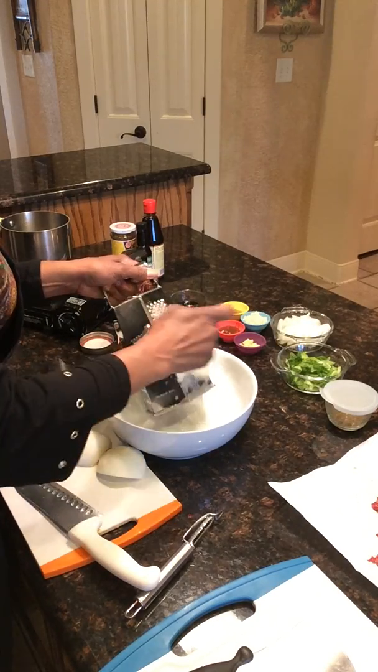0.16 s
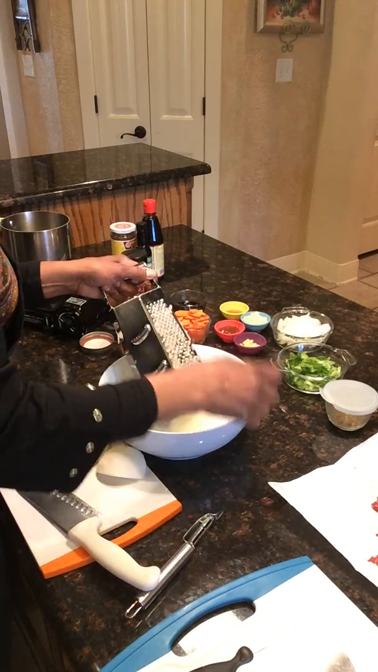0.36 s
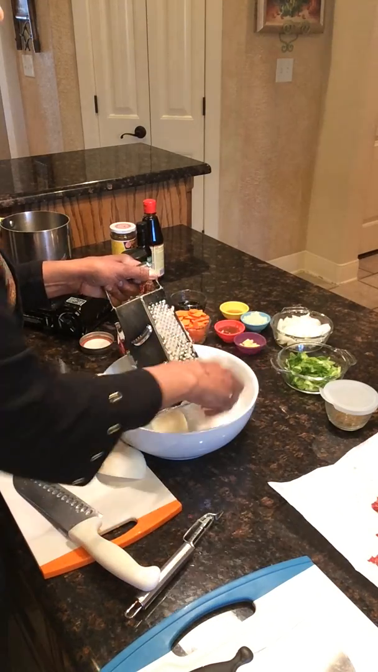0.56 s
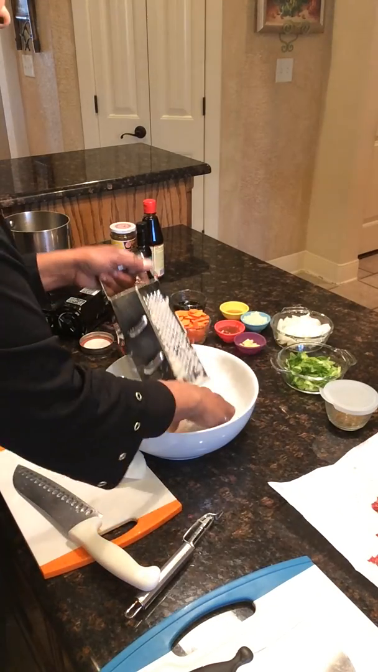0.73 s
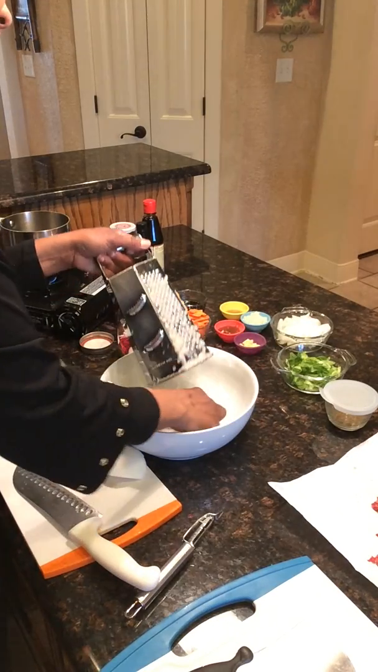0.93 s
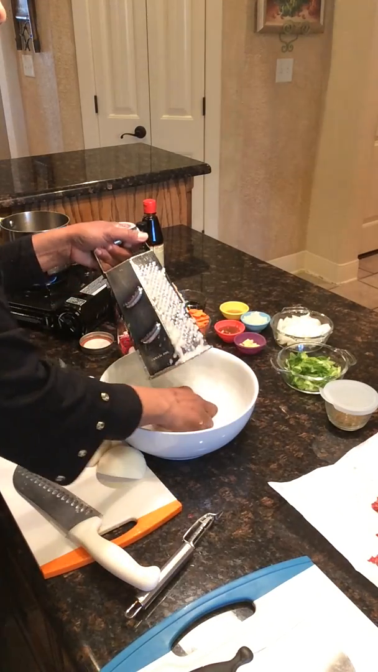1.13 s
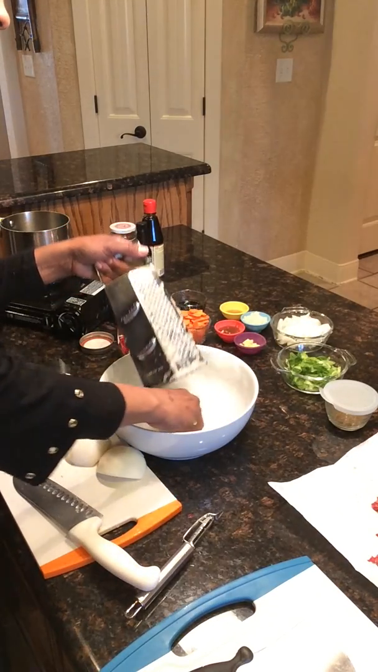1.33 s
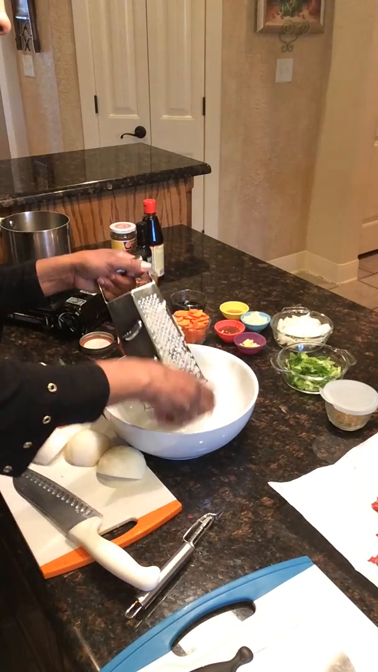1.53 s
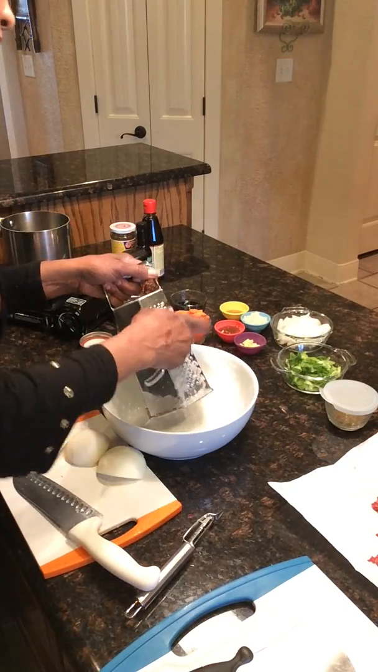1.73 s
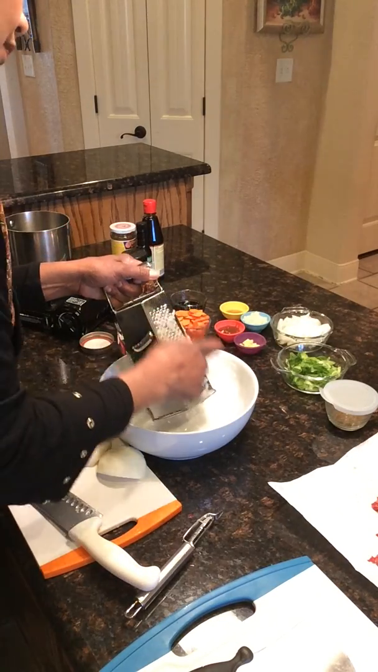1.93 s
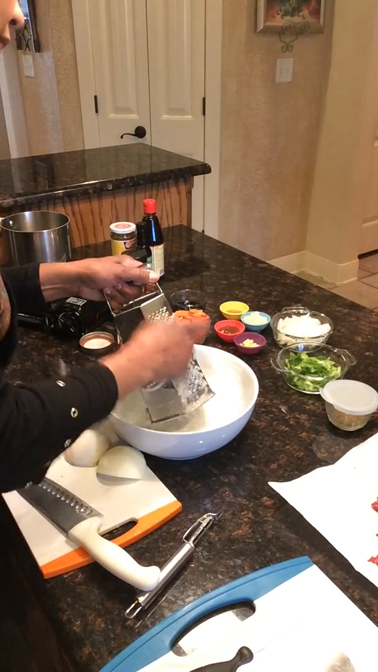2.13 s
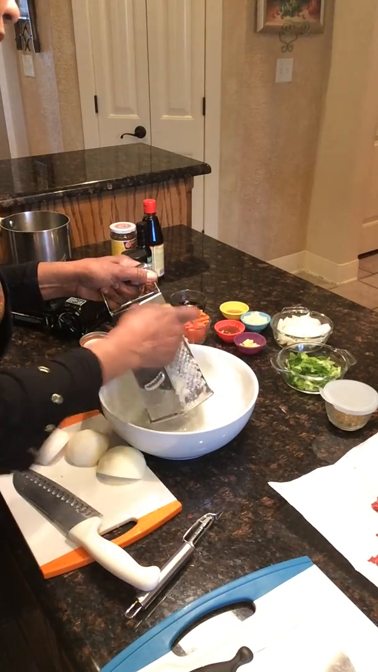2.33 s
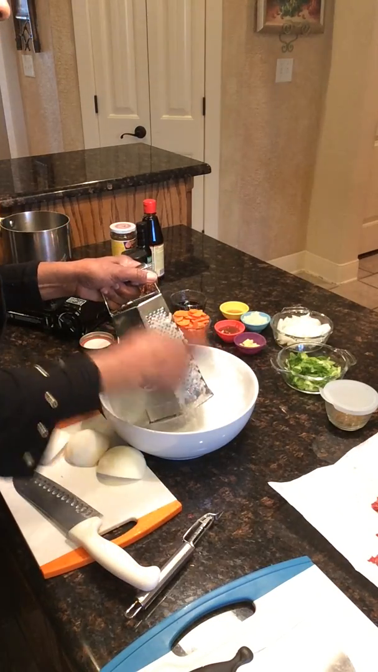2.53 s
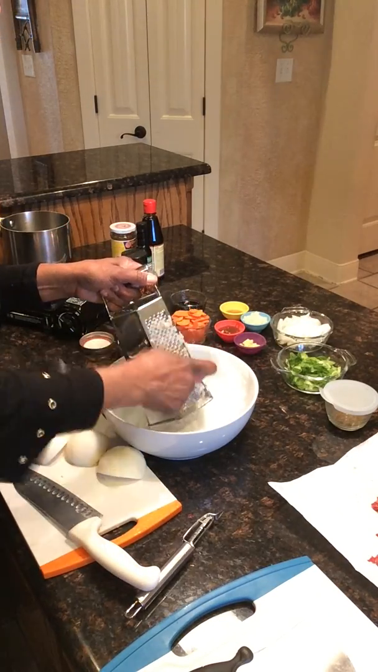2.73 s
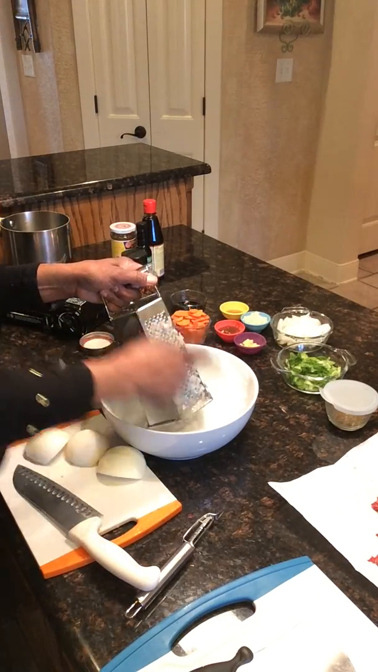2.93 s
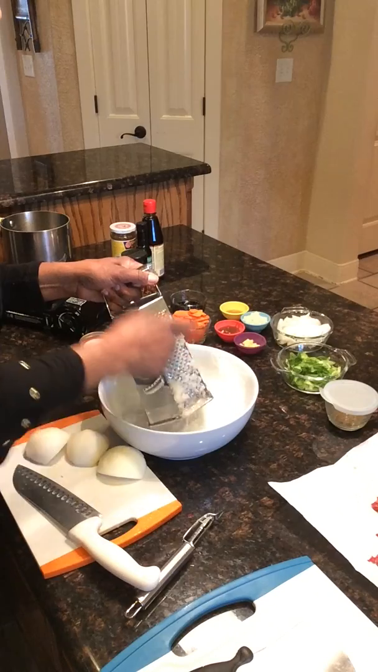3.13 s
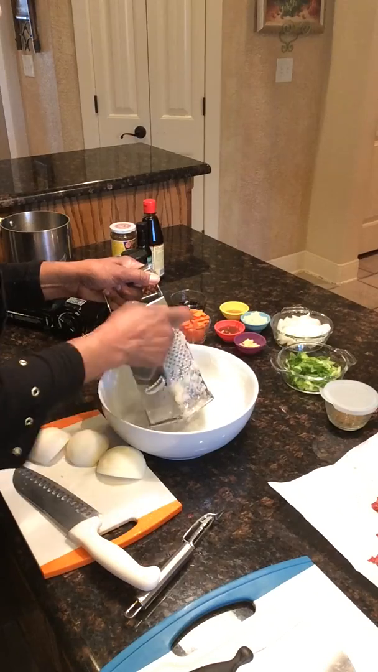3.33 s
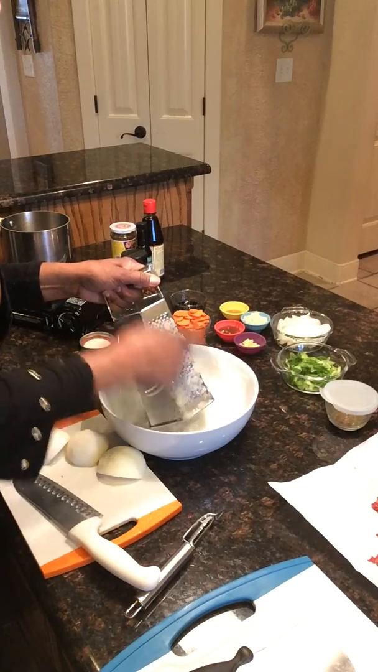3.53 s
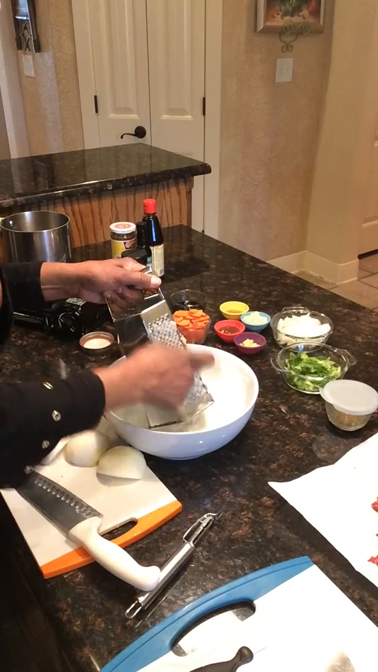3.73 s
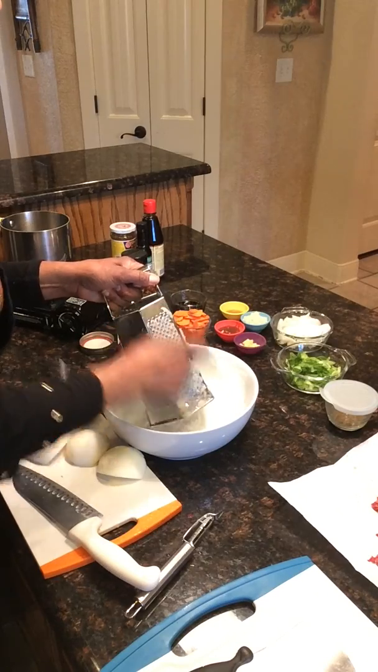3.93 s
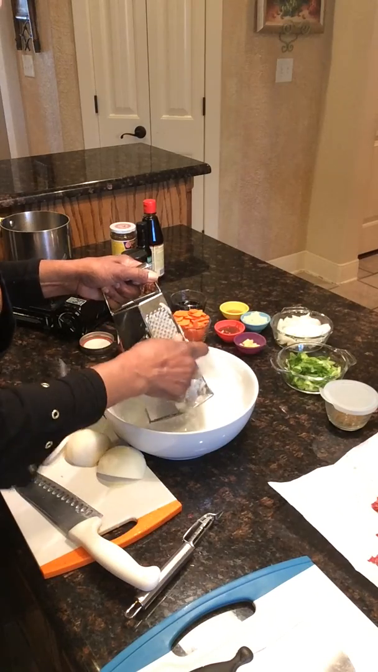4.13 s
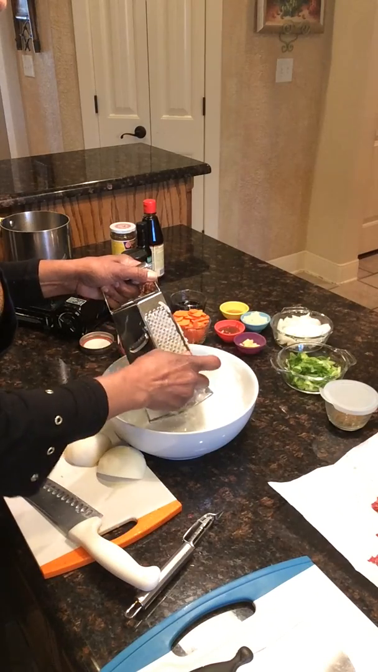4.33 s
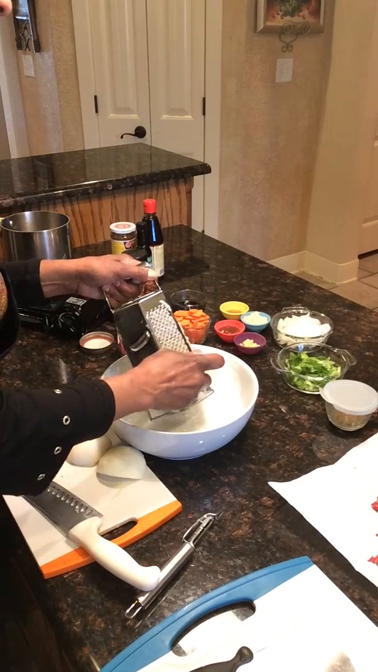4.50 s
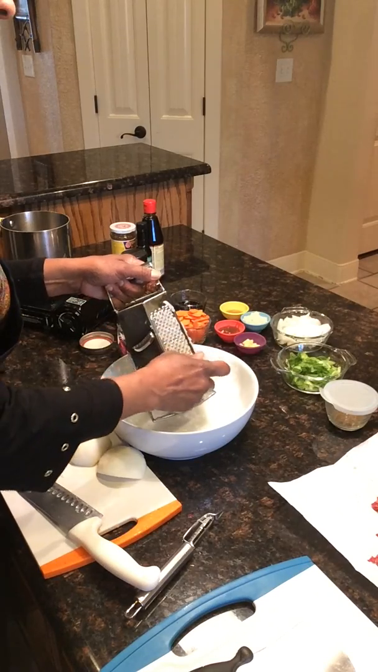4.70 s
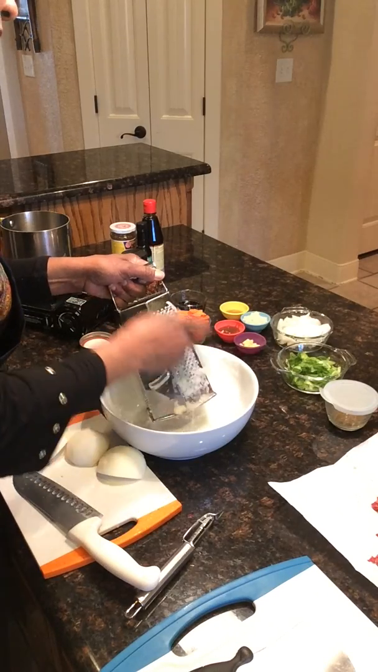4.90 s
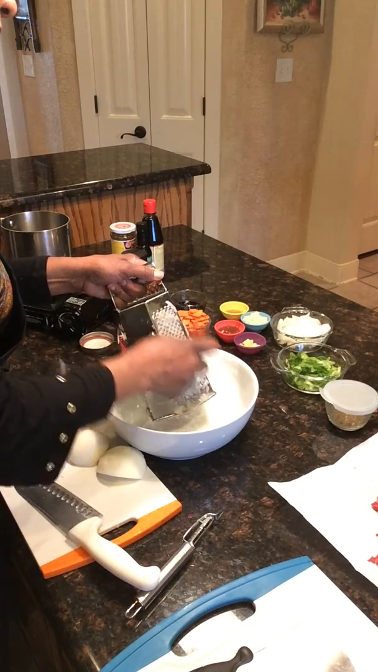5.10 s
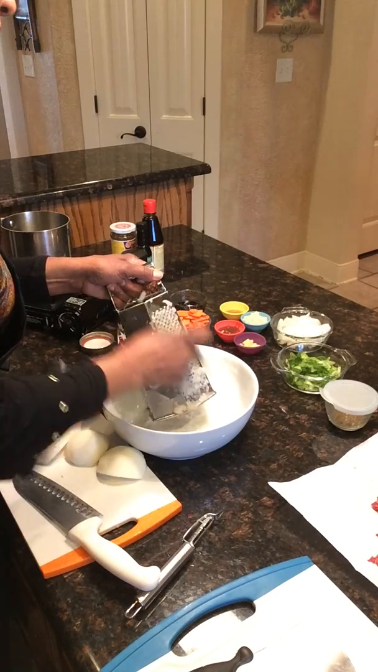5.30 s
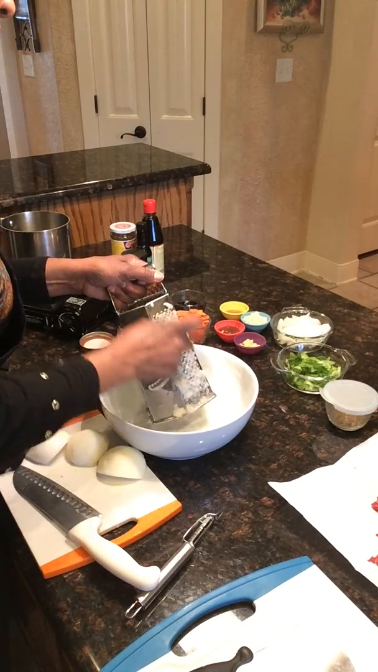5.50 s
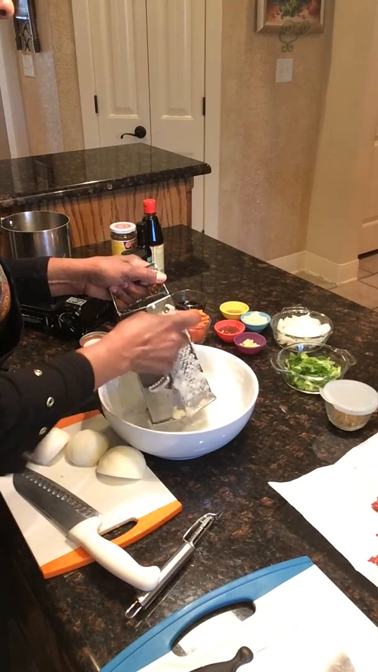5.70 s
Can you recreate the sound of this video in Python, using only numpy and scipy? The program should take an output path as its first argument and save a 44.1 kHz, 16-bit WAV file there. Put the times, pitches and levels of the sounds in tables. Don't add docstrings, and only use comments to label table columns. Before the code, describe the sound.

A metal box grater clanks and rings against a ceramic bowl, then firm produce rasps over its teeth in quick wet strokes in a quiet kitchen.

```python
import sys
import numpy as np
from scipy import signal
from scipy.fft import rfft, irfft
from scipy.io import wavfile
from scipy.ndimage import uniform_filter1d

SR = 44100
rng = np.random.default_rng(int(sys.argv[2]) if len(sys.argv) > 2 else 0)


def amplitude_ratio(level_db):
    exponent = np.asarray(level_db, float) / 20
    return 10 ** exponent


def to_wav(sig):
    pcm = np.clip(np.atleast_2d(sig), -1, 1) * 32767
    pcm = np.round(pcm).astype(np.int16)
    wavfile.write(sys.argv[1], SR, pcm.T)


N = 258117

# frequency in Hz, level in dB per Hz.
HUM_SPECTRUM = [(15, -68), (53, -32), (86, -15), (110, -9.5), (169, -6.5), (203, -7), (348, -4),
                (388, -9.5), (420, -5.5), (521, -13.5), (1230, -20), (1330, -18.5), (3070, -28.5),
                (9000, -40), (15400, -40.5)]
# frequency in Hz, width in Hz, level in dB.
MOTOR_NOTES = [(129.8, 7.4, -12), (192.8, 7.9, 1), (241, 35, -12.5), (278, 20, -9.5), (403.6, 7.2, -6)]
HUM_DB, MOTOR_DB = -58.5, -66
RUMBLE_DB = -83

# frequency in Hz, time to fall by 60 dB in seconds.
ROOM_DECAY = [(150, 0.68), (600, 0.48), (2000, 0.35), (8000, 0.29)]

# start in seconds, peak in dB.
PUSHES = [(0.139, -58.5), (.368, -46.5), (.435, -53), (.787, -61), (0.98, -65), (1.482, -66), (1.66, -43),
          (1.759, -55), (2.033, -52), (2.167, -59), (2.321, -61), (2.558, -54), (3.053, -57), (3.309, -73),
          (3.525, -58), (3.779, -53), (3.839, -61), (5.014, -58), (5.281, -64), (5.446, -63)]

# start in seconds, peak in dB, centre in Hz, width in Hz, time to fall by 60 dB in seconds.
TICKS = [(.103, -34, 9050, 7200, 0.028), (0.121, -39, 3300, 5030, 0.056), (0.236, -59, 6000, 5900, 0.065),
         (0.3644, -52, 8500, 4000, 0.021), (0.434, -52, 8450, 4000, 0.075),
         (.467, -54.5, 8460, 3500, 0.045), (.488, -63, 6000, 3000, .05), (.537, -46, 3350, 600, 0.034),
         (.537, -56.5, 6450, 3000, 0.041), (.57, -61, 7400, 2500, 0.04), (0.785, -59, 7050, 6000, 0.055),
         (1.66, -43.5, 5060, 6000, 0.062), (1.756, -45.5, 4400, 6000, 0.086),
         (1.907, -63.5, 7550, 2500, 0.071), (2.156, -54, 8600, 2970, 0.06), (2.165, -50, 13300, 3000, .07),
         (2.447, -58, 12500, 4000, .05), (4.8903, -62, 3710, 6000, 0.036), (5.766, -49.5, 7370, 9000, 0.32)]

# start in seconds, length in seconds, clatter level in dB, hiss level in dB, clatter centre in Hz.
DRAGS = [
    (.788, 0.054, -44, -61.5, 940),
    (.46, 0.03, -45.5, -76, 840),
    (1.77, 0.012, -38.5, -68, 690),
]

# strike in seconds, pitch in Hz, level in dB, time to fall by 60 dB in seconds,
# moment in seconds when a touch damps it.
CLEAR_NOTES = [(0.438, 1310, -47, .6, 0.535), (.537, 1310, -45.5, 0.65, .8), (.825, 1310, -54, .6, 1.13),
               (1.661, 1309, -40, 0.45, 1.78), (1.779, 1309, -59, .6, 1.93), (1.661, 447, -41, .27, 1.76),
               (1.661, 958, -45, .2, 1.76), (.79, 958, -50, .35, .97), (.787, 490, -55, .3, .87),
               (1.661, 1760, -44, .1, 1.76), (1.79, 290, -51, .3, 1.86)]

# frequency in Hz, level in dB, time to fall by 60 dB in seconds.
BOX_MODES = [(267, -7.5, 0.53), (456.2, -2, 0.24), (695, 0, 0.056), (730, -6, 0.045), (725.3, 11.5, 0.089),
             (850, -35, 0.038), (919, -8.5, 0.41), (1110, -27, 0.092), (1137, -11, 0.064),
             (1400, -46, 0.062), (1514, -40, 0.084), (1660, 4, 0.083), (2025, 3, 0.05), (2110, -6, 0.029),
             (2120, -6.5, 0.17), (2500, 7.5, 0.021), (2460, -24, 0.18), (2840, -50, 0.11),
             (2750, -37, 0.12), (4150, -16.5, 0.051), (7050, -18, 0.04), (8540, -36, .08)]
# frequency in Hz, level in dB, time to fall by 60 dB in seconds.
BOWL_MODES = [(398, -14, .14), (560, -16, .08), (727, -9, .1), (797, -10, .1), (985, -4, .1),
              (1044, -8, .08), (1114, -8, .08), (1200, -6, .05), (1290, 3, .06), (1389, -5, .06),
              (1540, -5, .06), (1750, -12, .05), (2164, -30, .08), (3483, -38, .06), (4301, -36, .15),
              (6907, -42, .15), (8005, -38, .08)]
GRIP = 0.49

# start in seconds, peak in dB, clatter centre in Hz,
# rattle length in seconds, tilt in dB per octave.
BOX_KNOCKS = [
    (.786, -32.5, 850, 0.0075, 0),
    (1.66, -20, 1225, 0.02, 1.4),
    (1.759, -23.5, 780, 0.0055, 1),
]
# start in seconds, peak in dB, clatter centre in Hz,
# rattle length in seconds, tilt in dB per octave.
BOWL_KNOCKS = [
    (.431, -41, 700, 0.0035, -11),
    (0.4346, -19.5, 1260, 0.0047, -3),
    (0.4406, -22, 1300, 0.0035, 2),
    (.4465, -22, 1210, 0.0043, -3.5),
]
# start in seconds, peak in dB, clatter centre in Hz,
# rattle length in seconds, tilt in dB per octave.
SOFT_KNOCKS = [(.054, -40.5, 790, 0.0072, -8), (0.103, -36.5, 1600, 0.0085, 4),
               (.122, -31, 1600, 0.0057, 1.8), (.126, -35.5, 666, 0.011, 10), (.236, -36, 820, 0.018, -1.5),
               (.367, -34.5, 614, 0.014, -6), (1.798, -29, 810, 0.0088, -1.5), (.812, -37, 1900, 0.017, 0),
               (2.166, -42.5, 710, 0.0095, -1), (4.892, -40.5, 1510, 0.0035, -4.5),
               (5.46, -40.5, 784, 0.003, -1.1)]

# firmest touch in seconds, level in dB, reach in seconds, low part in dB over the level.
BRUSHES = [(0, -51.5, 0.022, -5), (.05, -49.5, 0.086, -5), (.175, -51, 0.04, -0.5), (.275, -58, 0.042, 5),
           (.42, -68, .1, -14), (.56, -60.5, 0.097, 10.5), (.9, -71.5, 0.13, .1), (1.18, -76, 0.09, 7),
           (1.33, -72, 0.062, 4), (1.44, -63.5, 0.1, -15), (1.57, -68.5, 0.18, 0), (1.82, -68, .2, 5),
           (1.95, -63, .09, 10.5), (4.14, -56.5, 0.12, -11), (4.4, -72.5, .12, -9), (4.6, -69.5, 0.11, -8),
           (4.8, -69.5, 0.16, -14), (4.92, -56, 0.061, -10)]
# frequency in Hz, level in dB per Hz.
BRUSH_SPECTRUM = [(300, 2.5), (700, 2), (1500, -1), (2500, -8), (4000, -3), (8000, -8.5), (15300, -17.5)]
REACH_DB = -11
ARRIVE = 0.75

# start in seconds, length in seconds, rasp in dB, box boom in dB over the rasp.
CUTS = [(2.011, 0.095, -54.5, 0.5), (2.169, 0.059, -55, 6.5), (2.539, 0.083, -49, -8),
        (2.794, 0.084, -52, -3), (3.039, 0.078, -51, -4), (3.285, 0.086, -52.5, -5),
        (3.53, 0.079, -52.5, -3.5), (3.774, 0.086, -51, -6), (4.031, 0.095, -51, -7),
        (5.262, .093, -54.5, -2.5), (5.522, 0.08, -53.5, -9), (5.799, 0.12, -52, -3)]
# start in seconds, length in seconds, rasp in dB, box boom in dB over the rasp.
RETURNS = [(2.279, 0.086, -56, -1), (2.409, 0.067, -54.5, -1), (2.663, 0.076, -55, 2),
           (2.904, 0.076, -53.5, -5.5), (3.144, 0.093, -55, -3), (3.399, 0.076, -54.5, -4.5),
           (3.642, 0.083, -54, -2.5), (3.892, 0.091, -54.5, -6), (4.964, 0.097, -55, -8),
           (5.128, 0.09, -53.5, -3), (5.384, 0.09, -53, 0), (5.648, 0.087, -55.5, -3)]
CUT_GROWTH_DB, RETURN_GROWTH_DB = -3, 3.6
RING_DB, RING_PER_BOOM = -2, 0.53
# frequency in Hz, level in dB.
RASP_SPECTRUM = [(300, -1), (900, -4), (2000, -0.5), (2800, -5), (3600, -4), (4400, 0), (6000, -1.5),
                 (7900, -2.5), (8400, -14), (16000, -31)]
# frequency in Hz, level in dB.
FIZZ_SPECTRUM = [(6000, -49), (7900, 1.5), (8400, 0.5), (10500, -0.5), (12800, 0), (15300, -3.5)]
# frequency in Hz, width in Hz, level in dB.
TOOTH_RIMS = [(3350, 98, 1), (3640, 440, 4.5), (4160, 63, 6), (4800, 280, -15), (5200, 320, -17),
              (7400, 350, -9)]
# frequency in Hz, width in Hz, level in dB.
BOX_BOOM = [(638, 45, -3), (710, 28, 0), (752, 30, -4)]
# frequency in Hz, width in Hz, level in dB.
PANELS = [(1142, 23, 3), (1418, 90, -3), (1600, 133, 1), (1786, 49, 1.5), (2000, 30, -9), (2298, 61, -3)]


def evened(x):
    return x / np.sqrt(np.mean(x ** 2) + 1e-20)


def read(points, hz):
    f, value = np.transpose(points)
    return np.interp(np.log(hz + 1), np.log(f + 1), value)


def add(mix, s, sound):
    part = mix[round(s * SR):][:len(sound)]
    part += sound[:len(part)]


def coloured(x, spectrum):
    gain = amplitude_ratio(read(spectrum, np.fft.rfftfreq(len(x), 1 / SR)))
    return evened(irfft(rfft(x) * gain, len(x)))


def resonate(x, hz, width):
    r = np.exp(-np.pi * width / SR)
    return 2 * signal.lfilter([1 - r], [1, -r * np.exp(2j * np.pi * hz / SR)], x).real


def band(hz, width, size=8000):
    bass_cut = signal.butter(2, 0.18 * hz / (SR / 2), "high")
    noise = signal.lfilter(*bass_cut, rng.standard_normal(size))
    return evened(resonate(resonate(noise, hz, width), hz, width))


def flutter(span_s, depth_db):
    smooth = uniform_filter1d(rng.standard_normal(N), int(span_s * SR))
    return amplitude_ratio(depth_db * evened(smooth))


def body(x, modes, wander_db=0.):
    return evened(sum(amplitude_ratio(db) * flutter(0.085, wander_db) * resonate(x, hz, width)
                      for hz, width, db in modes))


def tearing(per_s, spread_db):
    size = amplitude_ratio(spread_db * np.minimum(rng.exponential(1, N), 4))
    return size * rng.standard_normal(N) * (rng.random(N) < per_s / SR)


def hum():
    notes = body(rng.standard_normal(N), MOTOR_NOTES)
    air = coloured(rng.standard_normal(N), HUM_SPECTRUM) * flutter(0.082, 0.66)
    rumble = band(55, 44, size=N) * flutter(0.24, 2.7)
    return amplitude_ratio(HUM_DB - 3.0) * air + amplitude_ratio(MOTOR_DB) * notes + amplitude_ratio(RUMBLE_DB) * rumble


def kitchen(x):
    taps = np.zeros(SR // 2)
    at = np.arange(200, len(taps) - 20, 20)
    taps[at + rng.integers(0, 20, len(at))] = rng.choice([-1., 1.], len(at))
    hz, t, z = signal.stft(taps, SR, nperseg=256)
    fade = amplitude_ratio(-60 * t / read(ROOM_DECAY, hz)[:, None])
    tail = signal.istft(z * fade, SR, nperseg=256)[1]
    return signal.fftconvolve(x, tail / np.linalg.norm(tail))[:N]


def push(peak_db):
    t = np.arange(8000) / SR
    deep = np.sin(2 * np.pi * 75 * t) * np.exp(-t / 0.034)
    upper = 0.81 * np.sin(2 * np.pi * 190 * t) * np.exp(-t / 0.033)
    return amplitude_ratio(peak_db + 0.5) * (deep + upper) * (1 - np.exp(-t / 0.013))


def tick(peak_db, hz, width, t60):
    t = np.arange(8000) / SR
    return amplitude_ratio(peak_db - 60 * t / np.clip(t60, .01, .3)) * band(hz, np.clip(width, 300, 12000))


def drag(length, low_db, hiss_db, hz):
    t = np.arange(8000) / SR
    hold = amplitude_ratio(-30 * t) * (1 - np.exp(-t / 0.013))
    after = np.maximum(t - length, 0)
    judder = amplitude_ratio(1.3 * evened(uniform_filter1d(rng.standard_normal(8000), size=250)))
    clatter = amplitude_ratio(low_db - 200 * after) * band(hz, 1.1 * hz)
    hiss = amplitude_ratio(hiss_db - 160 * after) * band(6000, 5500)
    return hold * judder * (clatter + hiss)


def clear_note(s, hz, db, t60, damped_s):
    t = np.arange(SR) / SR
    pair = np.sin(2 * np.pi * hz * t) + .3 * np.sin(2 * np.pi * (hz + 4.0) * t)
    fade_db = -60 * t / t60 - 450 * np.maximum(t + s - damped_s, 0)
    return np.sqrt(2) * amplitude_ratio(db + fade_db) * pair * (1 - np.exp(-t / 0.0025))


def knock(modes, peak_db, hz, rattle_s, tilt_db):
    t = np.arange(16000) / SR
    rattle_s = np.clip(rattle_s, .001, .05)
    rattle = rng.standard_normal(8000) * np.exp(-t[:8000] / rattle_s) * 0.75
    rattle[0] = 6.16
    rings = np.zeros(len(t))
    for f, db, t60 in modes:
        spot_db = 2.5 * rng.standard_normal()
        level_db = db + spot_db + tilt_db * np.log2(f / 1000)
        rings += amplitude_ratio(level_db - 60 * t / t60) * np.sin(2 * np.pi * f * t)
    clank = signal.fftconvolve(rings, rattle)[:len(t)]
    clatter = band(hz, 0.28 * hz, size=len(t)) * np.exp(-t / (0.68 * rattle_s)) * (1 - np.exp(-t / 0.0002))
    clank = clank / abs(clank).max() + .95 * clatter / abs(clatter).max()
    return amplitude_ratio(peak_db + 0.5) * clank / abs(clank).max()


def brushing():
    t, level = np.arange(N) / SR, np.zeros((2, N))
    for s, level_db, reach, low_db in BRUSHES:
        away = np.maximum(t - s, (s - t) / ARRIVE) / reach
        level += amplitude_ratio(level_db + REACH_DB * away) * amplitude_ratio([[0], [low_db]])
    rustle = coloured(tearing(5000, 0.58), BRUSH_SPECTRUM) * flutter(0.013, 1.0)
    shaken_box = body(tearing(1200, 3), BOX_BOOM + PANELS)
    return amplitude_ratio(-2.5) * level[0] * rustle + amplitude_ratio(-6.5) * level[1] * shaken_box


def stroke_levels():
    t, layers = np.arange(N) / SR, np.zeros((4, N))
    strokes = [(*row, CUT_GROWTH_DB) for row in CUTS] + [(*row, RETURN_GROWTH_DB) for row in RETURNS]
    for s, length, rasp_db, boom_db, growth_db in strokes:
        ring_db = RING_DB + RING_PER_BOOM * boom_db
        along = np.clip((t - s) / length, 0, 1)
        slack_db = -450 * np.maximum(s - t, 0) - 330 * np.maximum(t - s - length, 0)
        arch_db = -5 * abs(2 * along - 1) ** 2.5
        fizz_db = -6.0 - 0.3 * (rasp_db + 49.5)
        over_db = np.array([0 * t, boom_db + .6 * arch_db, ring_db + .3 * arch_db, fizz_db + 0 * t])
        layers += amplitude_ratio(rasp_db + 0.5 + slack_db + arch_db + growth_db * (along - .5) + over_db)
    return layers


def grating():
    rasp_level, boom_level, ring_level, fizz_level = stroke_levels()
    press = flutter(.012, 1.0)
    rims = body(tearing(3000, 2.2), TOOTH_RIMS, 3.6)
    rasp = (coloured(tearing(9000, 0.3), RASP_SPECTRUM) + amplitude_ratio(-5.0) * rims) * rasp_level
    fizz = coloured(tearing(14000, 0.69), FIZZ_SPECTRUM) * fizz_level
    boom = body(tearing(1200, 2.5), BOX_BOOM, 1.6) * boom_level
    ring = body(tearing(2500, 2.2), PANELS, 2.6) * ring_level
    shake = band(99, 130, size=N) * rasp_level
    return press * (rasp + fizz + amplitude_ratio(1.5) * boom + amplitude_ratio(1.0) * ring) + amplitude_ratio(-23.5) * shake


def scene():
    hits, notes = np.zeros((2, N))
    gripped = [(hz, db, GRIP * t60) for hz, db, t60 in BOX_MODES]
    for modes, table in ((BOX_MODES, BOX_KNOCKS), (BOWL_MODES, BOWL_KNOCKS), (gripped, SOFT_KNOCKS)):
        for s, *blow in table:
            add(hits, s, knock(modes, *blow))
    for row in CLEAR_NOTES:
        add(notes, row[0], clear_note(*row))
    for source, table in ((drag, DRAGS), (tick, TICKS), (push, PUSHES)):
        for s, *row in table:
            add(hits, s, source(*row))
    rubbing = grating() + brushing()
    far = hits + .6 * rubbing
    return (hits + rubbing + amplitude_ratio(-9.0) * kitchen(far) + notes + hum())[None]


def low_pass(x):
    return signal.sosfilt(signal.butter(12, 15430, fs=SR, output="sos"), x)


def record(dry):
    bass_cut = signal.lfilter(*signal.butter(3, 46 / (SR / 2), "high"), dry)
    edge = signal.firwin(301, 15380, window=("kaiser", 9), fs=SR)
    mix = signal.oaconvolve(bass_cut, edge[None], "same")
    return low_pass(mix)


dry = scene()
out = record(dry)
to_wav(out)
```